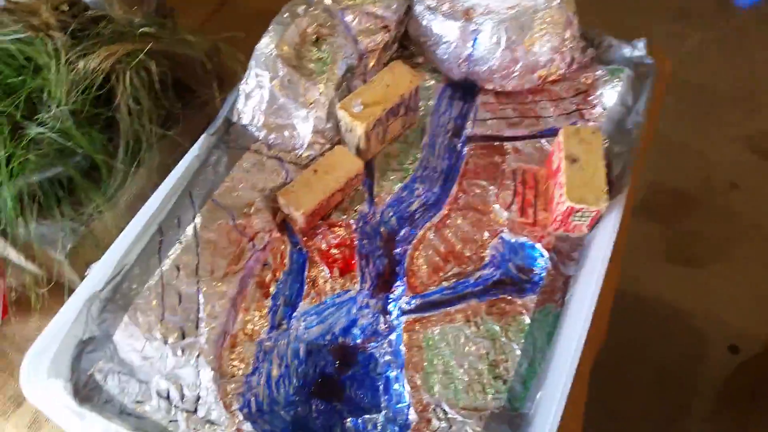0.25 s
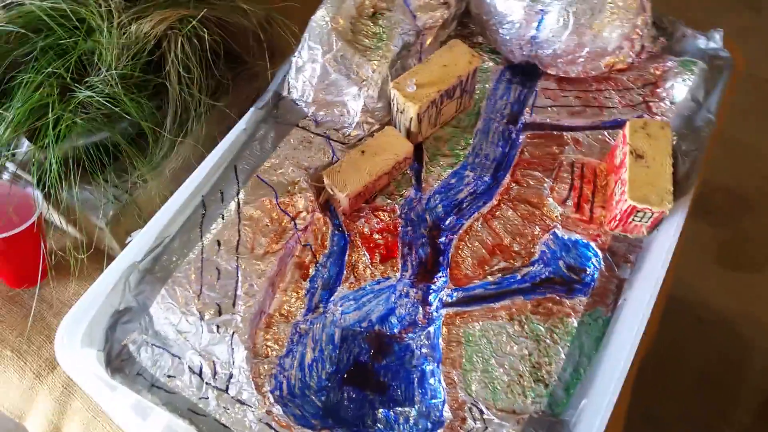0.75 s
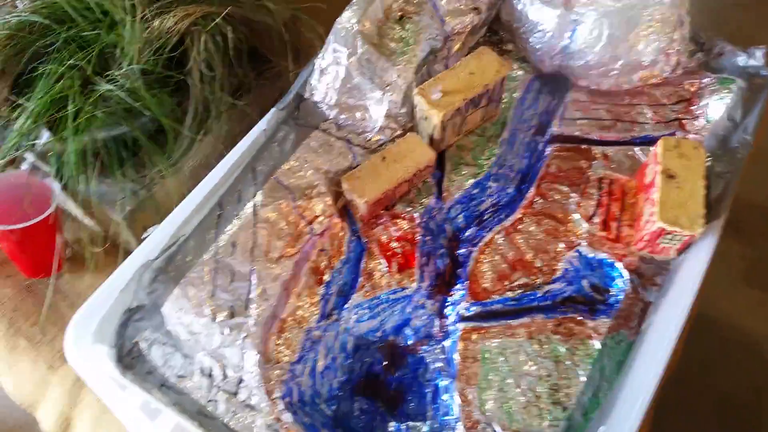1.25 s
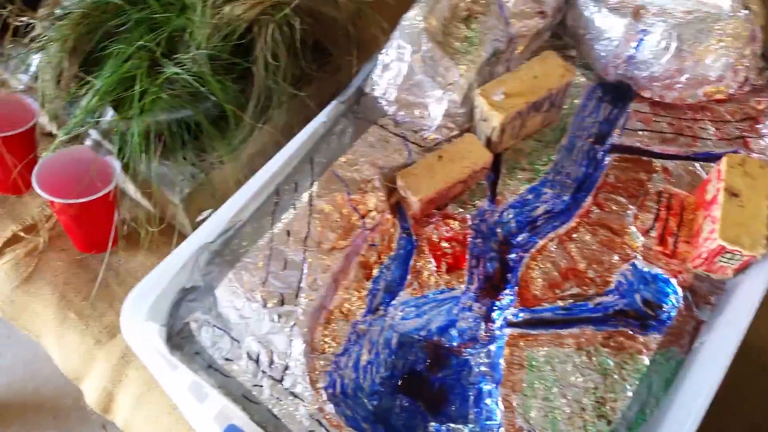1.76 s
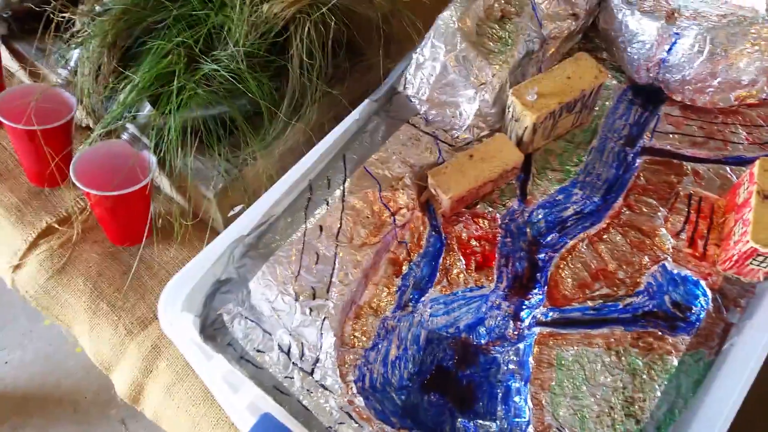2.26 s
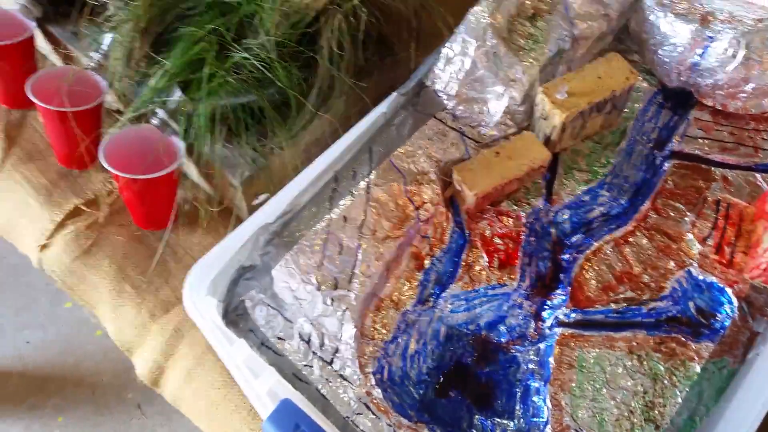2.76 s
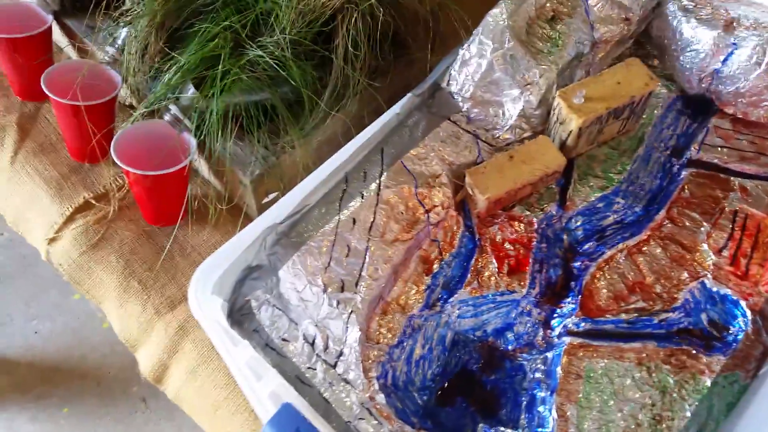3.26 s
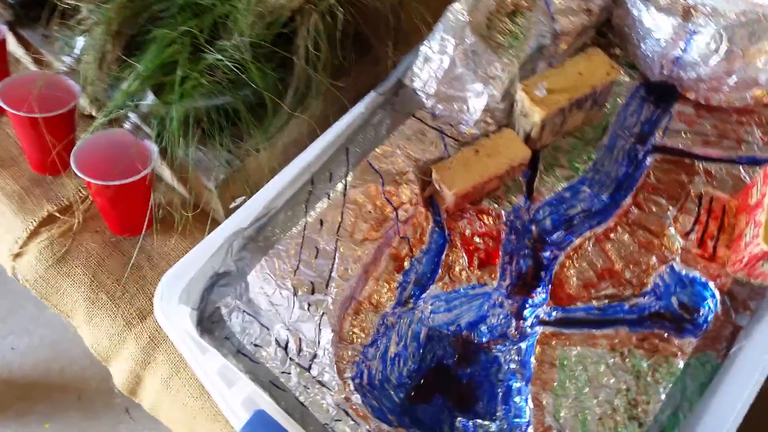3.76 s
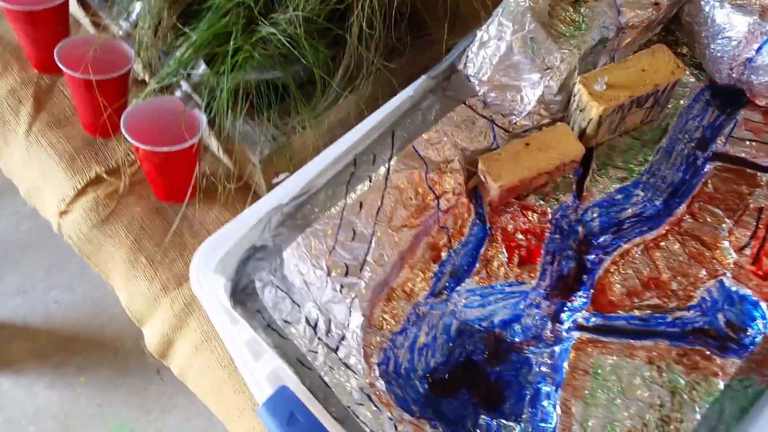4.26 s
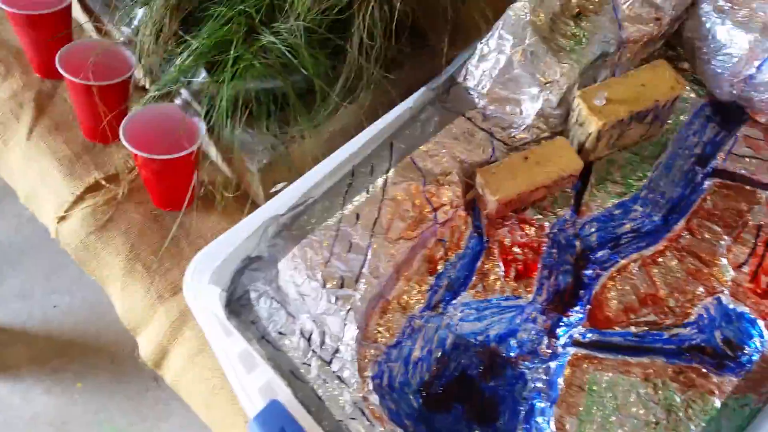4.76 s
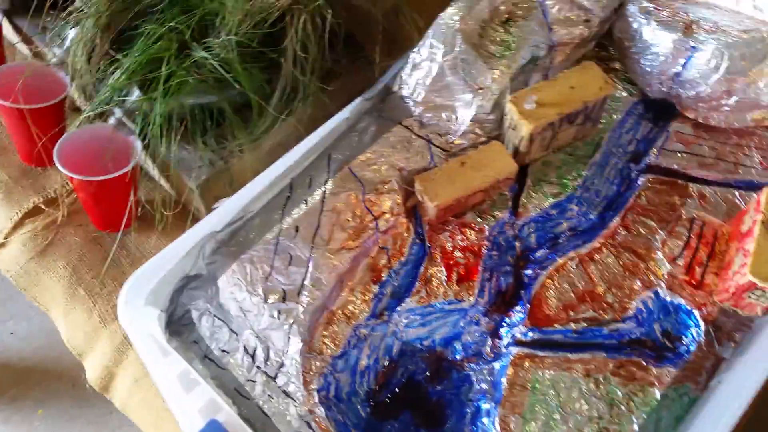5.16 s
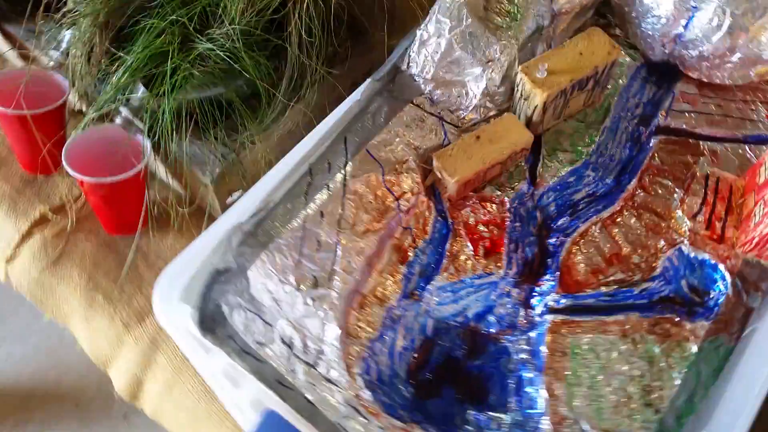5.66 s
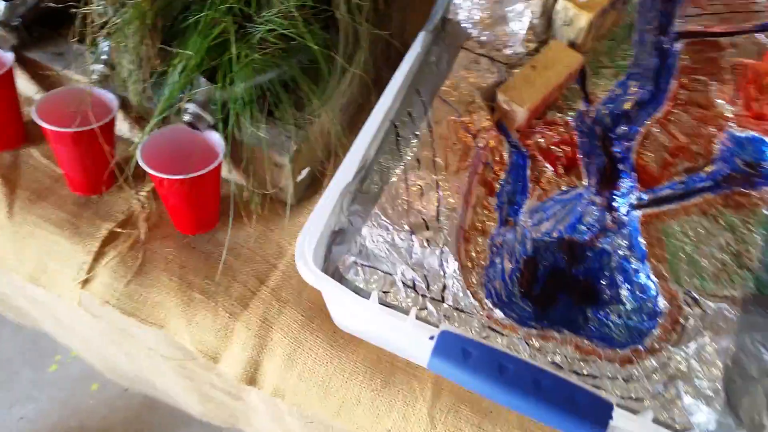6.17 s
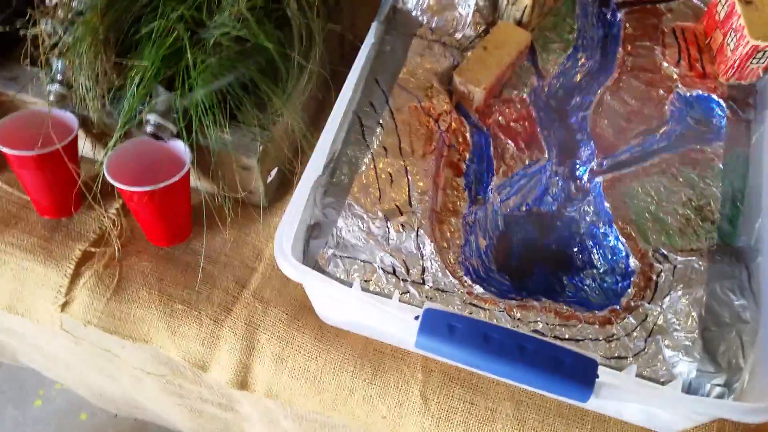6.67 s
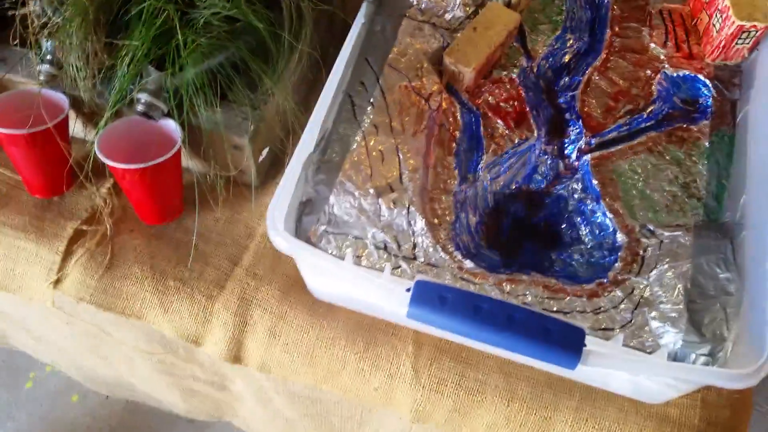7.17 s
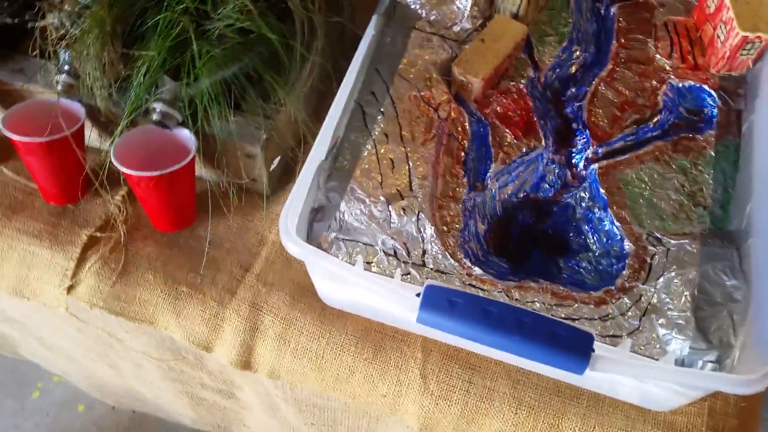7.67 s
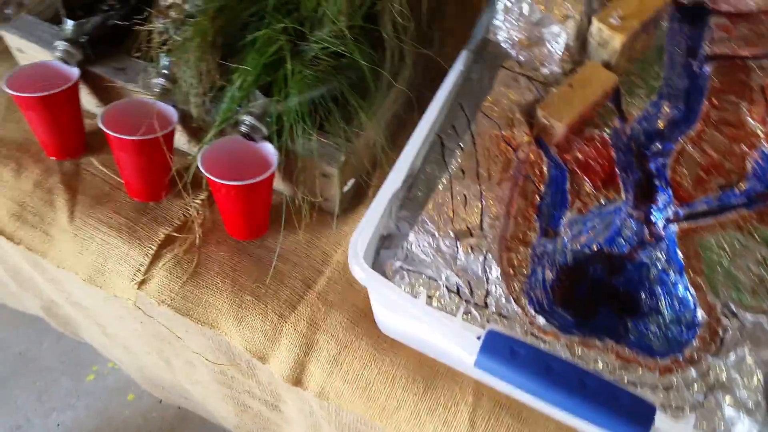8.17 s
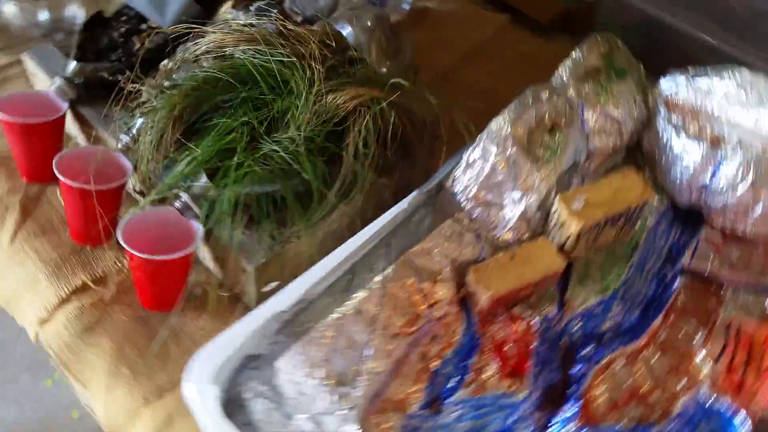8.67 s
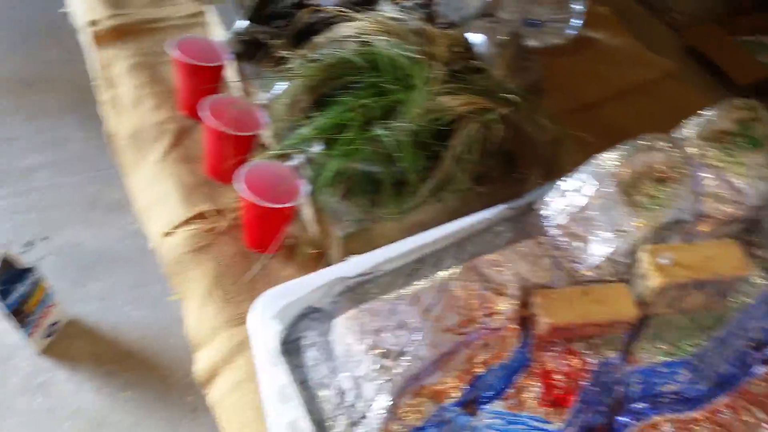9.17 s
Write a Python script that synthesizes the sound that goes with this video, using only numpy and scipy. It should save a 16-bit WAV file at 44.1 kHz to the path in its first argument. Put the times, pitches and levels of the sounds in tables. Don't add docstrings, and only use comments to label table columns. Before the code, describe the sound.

A trigger spray bottle is pumped steadily, two or three short hissing squirts a second with plastic clicks, over a low hall rumble.

```python
import sys
import numpy as np
from scipy import signal
from scipy.fft import rfft, irfft, next_fast_len
from scipy.io import wavfile
from scipy.ndimage import uniform_filter1d

SR = 44100
rng = np.random.default_rng(int(sys.argv[2]) if len(sys.argv) > 2 else 0)


def to_wav(s):
    ch = np.atleast_2d(s).T
    pcm = np.round(np.clip(ch, -1, 1) * 32767)
    wavfile.write(sys.argv[1], SR, pcm.astype(np.int16))


def gain_from_decibels(decibels):
    exponent = np.asarray(decibels, float) / 20
    return 10 ** exponent


N = 415863
TIME_S = np.arange(N) / SR
M = next_fast_len(N, True)
HZ = np.maximum(np.arange(M // 2 + 1) * SR / M, 1)

# (time [s], level [dB])
HALL = [(0, -50), (.34, -48), (.78, -49), (.94, -52), (1.4, -55.5), (2.4, -54.5), (2.94, -58), (3.86, -55),
        (4.1, -56.5), (4.81, -59), (5.6, -58), (6.5, -54.5), (7.35, -51.5), (7.7, -52), (8.1, -51),
        (8.64, -47), (8.8, -47), (9.43, -48)]
# (tick time [s], rise [s], hold [s], hiss at full pump [dB], hiss at valve shut [dB])
PULLS = [(0.1482, 0.072, .032, -25, -25), (0.514, 0.085, 0.01, -24.5, -23.5),
         (0.9, 0.071, 0.013, -25.5, -24.5), (1.2657, 0.052, 0.031, -27.5, -27),
         (1.6325, 0.055, 0.031, -31, -29), (2.001, 0.072, .028, -28, -34), (2.368, 0.052, 0.035, -33, -30),
         (2.732, 0.062, .032, -29.5, -34), (3.0843, 0.053, 0.038, -31, -31),
         (3.43, 0.058, 0.025, -29, -28.5), (3.9414, 0.055, 0.033, -31.5, -32),
         (4.362, 0.047, 0.039, -32.5, -32), (4.785, 0.051, 0.034, -30, -28),
         (5.138, 0.057, 0.017, -29, -27.5), (5.4976, .047, 0.031, -30, -26.5),
         (5.888, 0.046, .034, -31, -26.5), (6.3106, 0.06, 0.031, -30, -27),
         (6.6852, 0.06, 0.041, -27.5, -25), (7.057, 0.049, 0.043, -27.5, -24),
         (7.46, 0.084, 0.017, -22.5, -27), (7.982, 0.086, 0.028, -30, -28.5),
         (8.433, 0.089, 0.052, -24.5, -25.5), (8.822, 0.071, .04, -21.5, -25.5),
         (9.178, 0.061, 0.048, -25, -24)]
# (tick peak [dB], tick ring [Hz], first bite against full pressure [dB])
CATCHES = [(-37, 8170, -17.5), (-33.5, 8420, -18.5), (-33.5, 7800, -15.5), (-47, 6100, -17.5),
           (-39.5, 6930, -18), (-47, 8000, -19.5), (-54.5, 8030, -16), (-44, 8200, -21), (-51.5, 7240, -19),
           (-46, 6310, -19.5), (-66, 8120, -19.5), (-45, 6900, -15.5), (-44, 7000, -18),
           (-43.5, 6750, -18.5), (-44, 7100, -21), (-55, 6600, -23), (-51, 6110, -20.5), (-36, 7500, -22),
           (-44.5, 7170, -18), (-43.5, 6940, -25), (-72, 7000, -22), (-70, 7000, -23.5), (-27, 8200, -17),
           (-73, 7000, -17)]


def rms_one(x):
    return x / np.sqrt(np.mean(x ** 2) + 1e-20)


def in_time(rows):
    s, *columns = np.transpose(rows)
    return [np.interp(TIME_S, s, column) for column in columns]


def at_hz(points):
    hz, value = np.transpose(points)
    return np.interp(np.log(HZ), np.log(hz), value)


def drift(rate_hz):
    r = np.exp(-40 * np.pi * rate_hz / SR)
    noise = rng.standard_normal(N // 20 + 2002)
    slow = signal.lfilter([1], [1, -2 * r, r * r], noise)[2000:]
    return np.interp(np.arange(N) / 20, np.arange(len(slow)), rms_one(slow))


def stereo_noise(spectrum):
    # (pitch [Hz], likeness [-1 to 1])
    likeness = [(25, 0.2), (60, 0.95), (130, 0.9), (290, 0.73), (640, 0.59), (1200, 0.24), (2500, -0.057),
                (6800, -0.052), (15000, 0.12)]
    mid, side = rfft(rng.standard_normal((2, M)))
    alike = np.clip(at_hz(likeness), -1, 1)
    shared = np.sqrt(1 + alike) * mid
    apart = np.sqrt(1 - alike) * side * [[1], [-1]]
    pair = gain_from_decibels(at_hz(spectrum)) * (shared + apart)
    return pair / np.std(irfft(pair.mean(axis=0), M))


def zones(pair, centres_hz):
    slices = []
    for row in np.eye(len(centres_hz)):
        share = at_hz(list(zip(centres_hz, row)))
        slices.append(irfft(pair * share, M)[:, :N])
    return slices


def knocks(events, t60, crack_share, low_hz, high_hz, order):
    out = np.zeros(N)
    t = np.arange(round(t60 * SR)) / SR
    for s, db, hz in events:
        ring = np.sin(2 * np.pi * hz * t) * (1 - np.exp(-t * hz))
        crack = crack_share * rng.standard_normal(len(t))
        out[round(s * SR):][:len(t)] += gain_from_decibels(db - 60 * t / t60) * (ring + crack)
    band = signal.butter(order, [low_hz, high_hz], "band", fs=SR, output="sos")
    return signal.sosfilt(band, [out, np.roll(out, 6)])


def hum():
    # (pitch [Hz], level over the rumble [dB])
    fans = [(28, -11.5), (58, -10.5), (148, -6)]
    # (time [s], pitch [Hz], level over the rumble [dB])
    motors = [
        [(0, 116, -0.5), (3.3, 117, -1), (4, 121, 0), (5, 129, -3.5), (6.5, 141, -4.5), (6.75, 142, -6),
         (6.8, 116, -3), (9.43, 117, -1.5)],
        [(7.1, 97, -28), (7.3, 97, 5.5), (7.7, 96, -13.5), (8.6, 92, -8), (9.43, 92, -12.5)],
    ]
    out = 0
    for hz, db in list(fans) + [in_time(motor) for motor in motors]:
        waver_hz = 0.6 * drift(1.89)
        phase = 2 * np.pi * np.cumsum(hz + waver_hz) / SR
        out_of_step = 0.37 * drift(2.0) * [[1], [-1]]
        out = out + gain_from_decibels(db + 1.4 * drift(3.8)) * np.sin(phase + out_of_step)
    return out


def background():
    # (pitch [Hz], level per Hz [dB])
    rumble = [(15, -12), (40, -14.5), (65, -4.5), (130, -2.5), (170, -3.5), (229, -8.5), (409, -7),
              (545, -9.5), (783, -10.5), (1230, -30.5), (1500, -25.5), (2200, -36.5), (3300, -83.5)]
    # (pitch [Hz], level per Hz [dB])
    wash_colour = [(530, -48.5), (900, -8.5), (1190, -11.5), (1640, -17), (2600, -14.5), (3230, -33.5),
                   (4980, -22), (5610, -22.5), (7770, -28.5), (10900, -72.5), (16000, -47)]
    hall_db, = in_time(HALL)
    passing_db = 3.5 * np.exp(-((TIME_S - 2.08) / 0.194) ** 2)
    deep, upper = zones(stereo_noise(rumble), [160, 240])
    deep = gain_from_decibels(hall_db + 3.0 + 2.4 * drift(3.4)) * deep + gain_from_decibels(hall_db + 1.3) * hum()
    upper = gain_from_decibels(hall_db + passing_db + 3.5 + 0.5 * drift(9.2)) * upper
    wash = sum(z * gain_from_decibels(1.4 * drift(12.0)) for z in zones(stereo_noise(wash_colour), [1500, 6000]))
    wash_db = -66 + 1.63 * (hall_db + 55.5)
    return deep + upper + gain_from_decibels(wash_db) * wash


def pressure():
    # (time [s], hiss [dB])
    leftover = [
        (0, -49),
        (.02, -51),
        (.13, -61.5),
    ]
    take_up_s, seep_db = 0.013, -28.5
    bite_s, knee_share, knee_db = 0.012, 0.63, 0.5
    rows = list(leftover)
    for (s, rise, hold, full_db, end_db), (_, _, bite_db) in zip(PULLS, CATCHES):
        start = s + take_up_s
        knee = start + bite_s + knee_share * (rise - bite_s)
        shut = start + rise + hold
        closed = shut + 0.018 + 0.22 * rise
        dry_s = shut + 0.036 + rise
        rows += [
            (start - 0.012, -72),
            (start, full_db + seep_db),
            (start + bite_s, full_db + bite_db),
            (knee, full_db + (1 - knee_share) * bite_db + knee_db),
            (start + rise, full_db),
            (shut, end_db),
            (closed, end_db - 16.5),
            (dry_s, end_db - 29),
            (dry_s + 0.024, -75),
        ]
    return in_time(rows)[0]


def spray():
    # (pitch [Hz], level per Hz [dB])
    jet = [(500, -39.5), (800, -17), (1300, -17.5), (1700, -10), (2600, -10), (4800, -8.5), (5400, -7.5),
           (6400, -3.5), (7900, 2.5), (8700, 1.5), (9500, -4.5), (11500, -6), (13000, -8.5), (15500, -3.5)]
    # (time [s], nearness [dB], turn away [dB], tip down to the tray [dB])
    aim = [(.25, 7, -2, 2), (.62, 1.5, -1, 2), (.99, -2.5, 2, 1.5), (1.72, 1.5, -4.5, 1.2),
           (2.455, -4, -5.5, 1.4), (3.51, -4.5, 0.5, 0.5), (4.03, -3.5, -3.5, 0.4), (4.45, -3, -2, -0.5),
           (4.87, -4, 4, -1.6), (5.215, -7.5, 6, -1.5), (5.97, 0, 5.5, 0), (6.4, 2.5, -1, -0.5),
           (7.15, 3.5, 0.5, -0.3), (7.56, 4, 0, 0.5), (8.09, 4.5, -3.5, 0.5), (8.55, 4.5, 4, -1),
           (8.92, 5.5, 5.5, -1.5), (9.27, 4, 5, -3)]
    # (time [s], flare [dB])
    flares = [(.588, -2), (.942, 6.5), (1.318, -5), (1.686, -1), (2.064, -1), (2.427, -1), (2.788, 3),
              (3.144, 1), (3.489, 4.5), (4.003, -4), (4.41, -2), (4.828, 5), (5.201, 8), (5.558, 4),
              (5.944, 0.5), (6.379, 3.5), (8.039, 5)]
    zones_hz = [1000, 1700, 3200, 4700, 5800, 8200, 10000, 14800]
    steepness = [0.82, 0.79, 1.09, 1, 1.106, 1.354, 1.84, 1.29]
    per_nearness = [0.77, 1.11, 0.65, 0.55, 0.57, .01, .02, -0.11]
    per_turn = [0.072, -0.14, -0.16, -0.28, 0.39, -0.12, -1.25, -0.39]
    per_tip = [-0.93, -0.63, 1.4, 0.81, -.8, 0.63, 0.013, -0.34]
    steeper_per_tip = [0.0037, -0.025, 0.022, 0.031, -.02, 0.049, -0.012, .01]
    steeper_per_nearness = [-0.0062, .01, .015, -0.0094, -.005, -0.026, -0.037, -.015]
    pressure_db = pressure()
    near_db, turn_db, tip_db = in_time(aim)
    opens = np.zeros(N)
    for s, db in flares:
        opens[round(s * SR)] = db
    flare_db = signal.lfilter([1], [1, -np.exp(-1 / (0.0041 * SR))], opens)
    sputter_db = 0.28 * drift(250) + 0.23 * drift(50) + flare_db
    out = 0
    for k, zone in enumerate(zones(stereo_noise(jet), zones_hz)):
        aim_db = per_nearness[k] * near_db + per_turn[k] * turn_db + per_tip[k] * tip_db
        steep = steepness[k] + steeper_per_tip[k] * tip_db + steeper_per_nearness[k] * near_db
        push_db = -24.5 + steep * (pressure_db + 28.5)
        out = out + zone * gain_from_decibels(push_db + aim_db + sputter_db + 1.64 * drift(36.0))
    return out


def trigger_ticks():
    # (time [s], peak [dB], ring [Hz])
    returns = [(0.011, -35, 6160), (.4854, -50, 8350), (.7604, -37, 6900), (1.2264, -56, 7090),
               (1.9669, -53, 8340), (2.5566, -39, 7140), (3.8404, -55, 7150), (4.6934, -65, 5040),
               (4.9144, -36, 8210), (5.7508, -51, 6270), (6.171, -53, 6190), (6.5715, -49, 7500),
               (6.9364, -41, 7100), (7.2514, -46.5, 6130), (7.3048, -41, 7870), (7.7234, -46, 6550),
               (9.0694, -42, 6870)]
    # (time [s], peak [dB], ring [Hz])
    snaps = [
        (.39, -54, 14500),
        (2.955, -65.5, 14500),
        (6.248, -61, 14500),
        (7.022, -58, 14500),
        (9.07, -47, 15000),
        (9.168, -48, 14000),
        (9.183, -50, 14200),
    ]
    catches = [(pull[0], *catch[:2]) for pull, catch in zip(PULLS, CATCHES)]
    contacts = sorted(catches + returns)
    ticks = knocks(contacts, 0.011, 0.7, 5000, 11000, order=2)
    ticks += gain_from_decibels(-17) * knocks(contacts, 0.006, 3.43, 13000, 17000, order=2)
    return ticks + knocks(snaps, 0.005, 2.5, 12000, 17000, order=2)


def reverb(x):
    # (pitch [Hz], time to fall 60 dB [s])
    echo_times = [(500, .9), (1500, 0.87), (2700, 0.71), (3600, 0.56), (4800, 0.65), (6000, 0.53),
                  (9000, 0.36), (15000, 0.35)]
    hz, t60 = np.transpose(echo_times)
    t = np.arange(2 * SR) / SR
    slices = zones(rfft(rng.standard_normal((2, M))), hz)
    echoes = sum(part[:, :2 * SR] * gain_from_decibels(-60 * t / d) for part, d in zip(slices, t60))
    echoes = echoes * (1 - np.exp(-t / 0.021))
    return signal.fftconvolve(x, echoes / np.sqrt(SR), axes=1)[:, :N]


def trolley_rings():
    # (time [s], peak [dB], ring [Hz])
    jolts = [
        (1.99, -50.5, 323),
        (2.0, -51.5, 557),
        (2.03, -47.5, 419),
        (2.13, -53, 435),
        (2.13, -54, 552),
        (2.17, -47.5, 324),
    ]
    return knocks(jolts, 0.72, 0.05, 200, 800, order=1)


def drips():
    # (time [s], peak [dB], ring [Hz])
    drops = [
        (3.258, -46, 1540),
        (4.56, -50, 1500),
        (5.742, -50, 1800),
        (5.829, -53, 1700),
    ]
    return knocks(drops, 0.026, 0.05, 900, 3000, order=1)


def rattle():
    # (time [s], peak [dB], ring [Hz])
    bottle_knocks = [(3.8397, -51.5, 3000), (9.118, -37, 2000), (9.126, -33, 4200), (9.129, -36, 4770),
                     (9.131, -36, 2100), (9.160, -38, 7700), (9.163, -34, 4500), (9.167, -29, 7600),
                     (9.168, -37, 1880), (9.170, -43, 7600), (9.174, -37, 4270), (9.176, -37, 1980),
                     (9.183, -33, 7840)]
    return knocks(bottle_knocks, 0.018, 0.8, 780, 7500, order=2)


def bumps():
    # (time [s], peak [dB], pitch [Hz])
    touches = [
        (7.33, -36.5, 45),
        (7.42, -42, 70),
        (8.8, -32, 40),
    ]
    return knocks(touches, 0.23, 1.7, 15, 130, order=2)


def rustle():
    # (time [s], level [dB])
    slip = [
        (9.09, -70),
        (9.115, -47),
        (9.13, -50),
        (9.15, -47),
        (9.17, -45),
        (9.19, -49),
        (9.22, -72),
    ]
    level_db, = in_time(slip)
    clicks = (rng.random((2, N)) < 2500 / SR) * rng.laplace(size=(2, N))
    band = signal.butter(2, [900, 5500], "band", fs=SR, output="sos")
    return gain_from_decibels(level_db) * rms_one(signal.sosfilt(band, clicks))


def scene():
    bottle = spray() + trigger_ticks() + drips() + rattle() + rustle()
    return bottle + reverb(bottle) + background() + trolley_rings() + bumps()


def ducked(x):
    power = uniform_filter1d(np.mean(x ** 2, axis=0), size=round(0.04 * SR))
    level_db = 10 * np.log10(np.abs(power) + 1e-12)
    excess_db = np.maximum(level_db - in_time(HALL)[0] - 15.5, 0)
    return x * gain_from_decibels(-0.11 * excess_db)


def top_cut(x):
    return signal.sosfilt(signal.butter(12, 17000, fs=SR, output="sos"), x)


def record(dry):
    # (pitch [Hz], left minus right [dB])
    port_difference = [(30, 0), (100, -2.5), (300, -1), (600, 4), (1000, 6.5), (1600, 12.5), (2600, 17.5),
                       (4200, 20.5), (6000, 43), (8000, 53.5), (9500, 21.5), (11500, 12.5), (13500, -3.5),
                       (15800, -4)]
    hiss_db = [
        [-79],
        [-83],
    ]
    # (pitch [Hz], level per Hz [dB])
    hiss_colour = [(4200, -9), (7000, 1)]
    left_share = 1 / (1 + gain_from_decibels(-2 * at_hz(port_difference)))
    ports = rfft(ducked(dry), M) * np.sqrt(2 * np.array([left_share, 1 - left_share]))
    gain_db = 1.1 * (in_time(HALL)[0] + 55)
    noise = gain_from_decibels(np.array(hiss_db) + gain_db) * rng.standard_normal((2, N))
    hiss = rfft(noise, M) * gain_from_decibels(at_hz(hiss_colour))
    cut = gain_from_decibels(-np.clip((HZ - 15750) / 6.5, 0, 80))
    mix = irfft((ports + hiss) * cut, M)[:, :N]
    return top_cut(mix)


dry = scene()
out = record(dry)
to_wav(out)
```